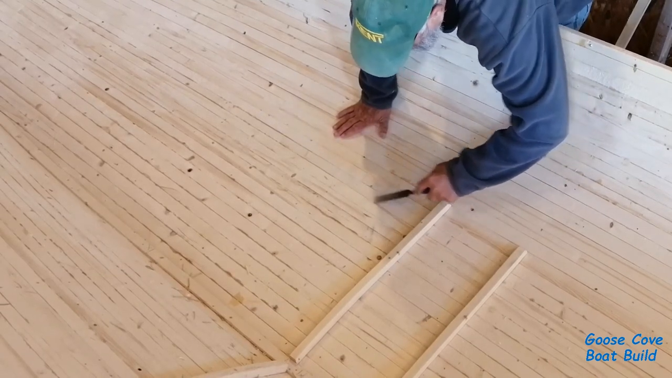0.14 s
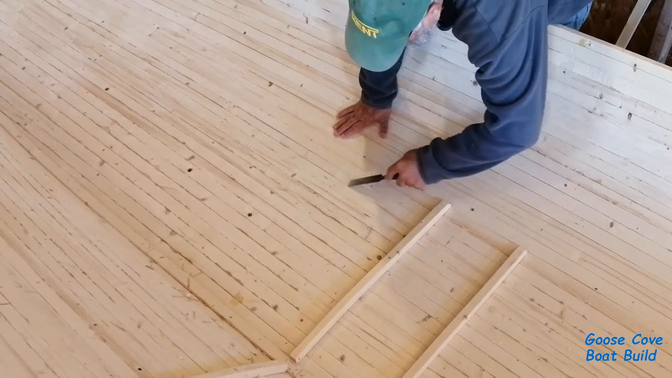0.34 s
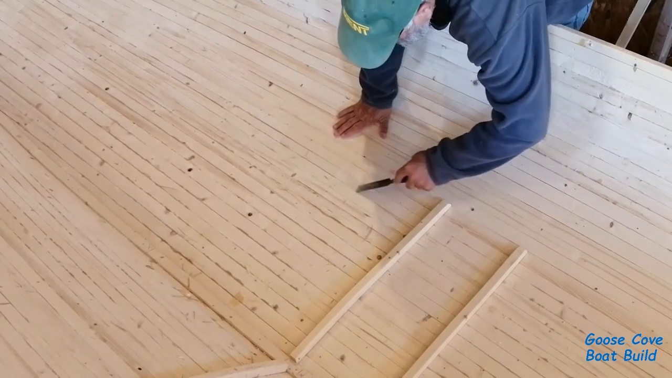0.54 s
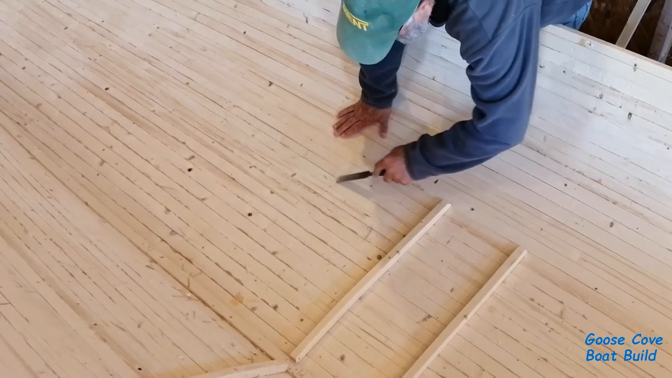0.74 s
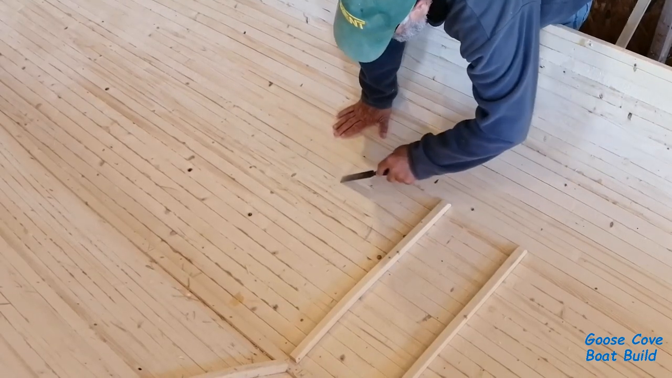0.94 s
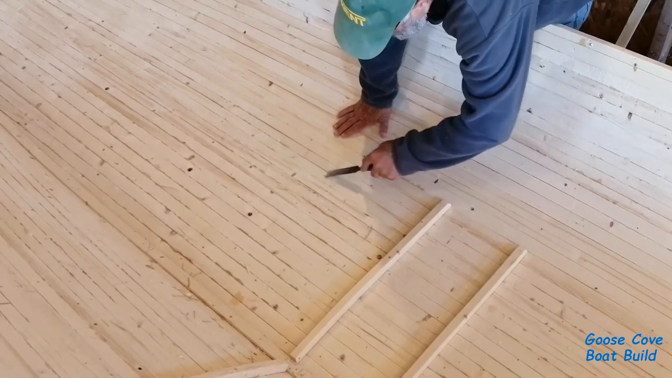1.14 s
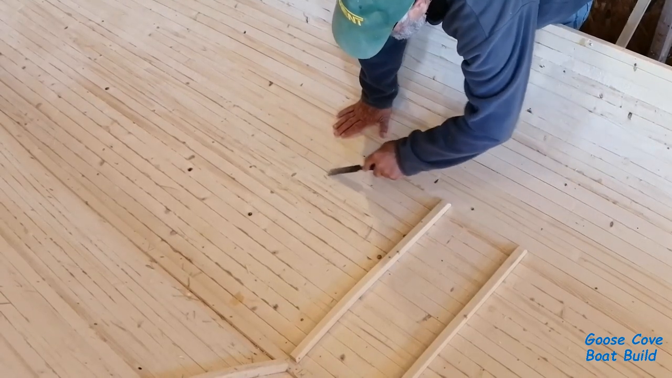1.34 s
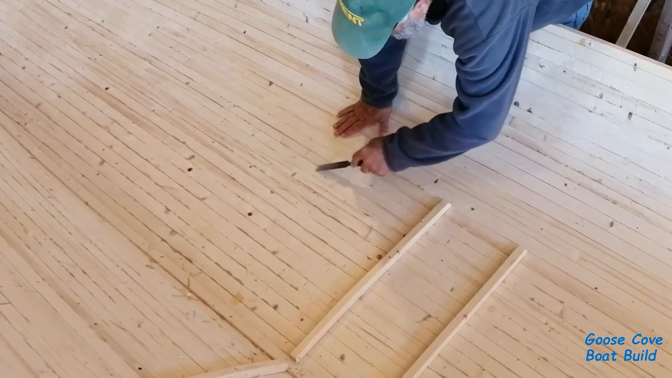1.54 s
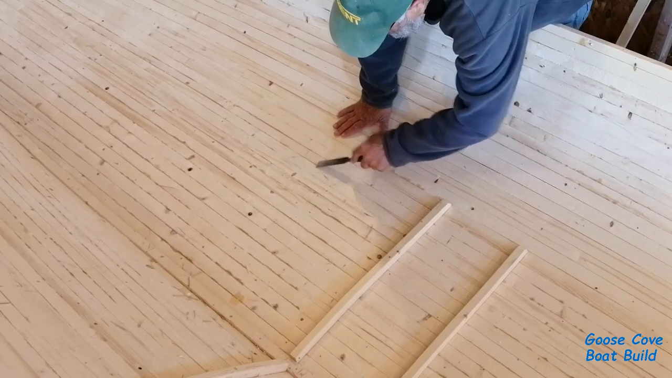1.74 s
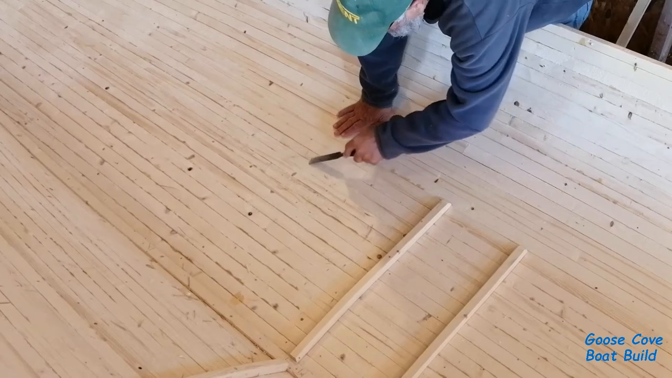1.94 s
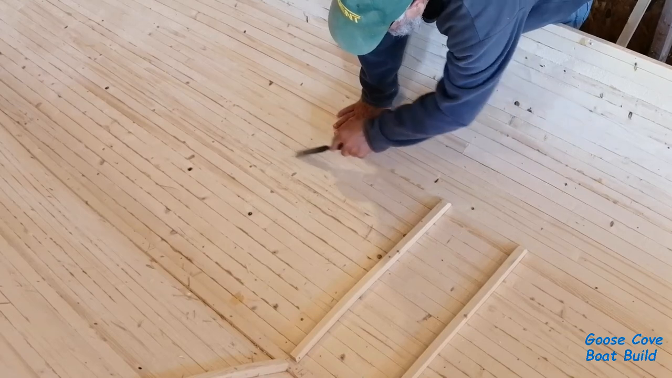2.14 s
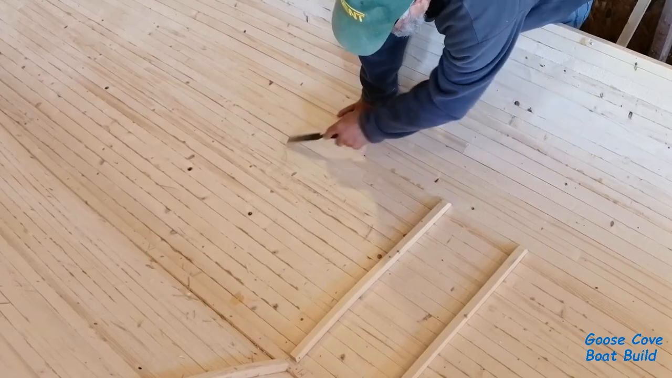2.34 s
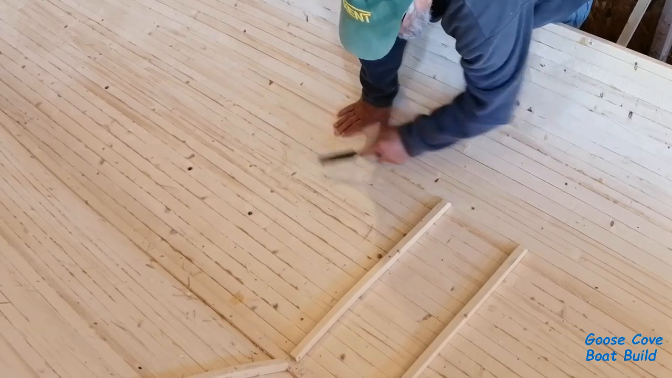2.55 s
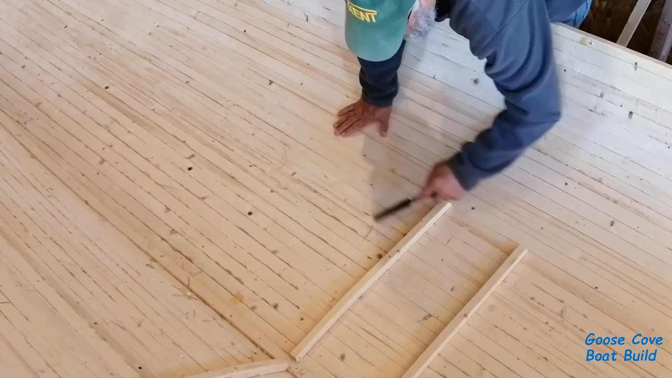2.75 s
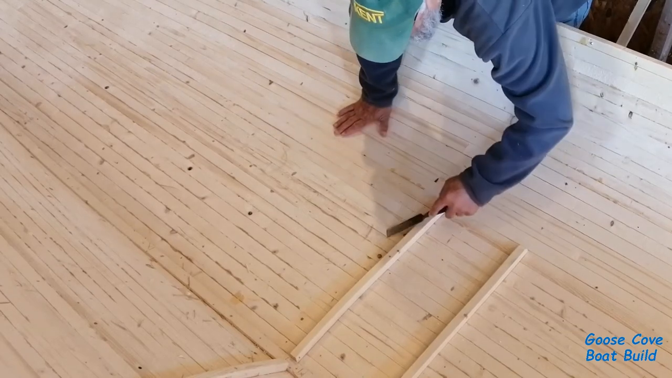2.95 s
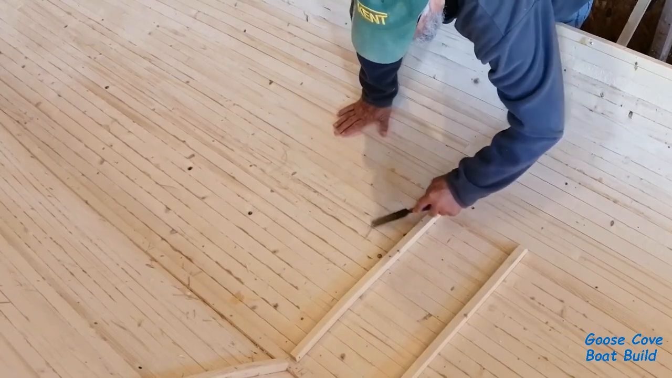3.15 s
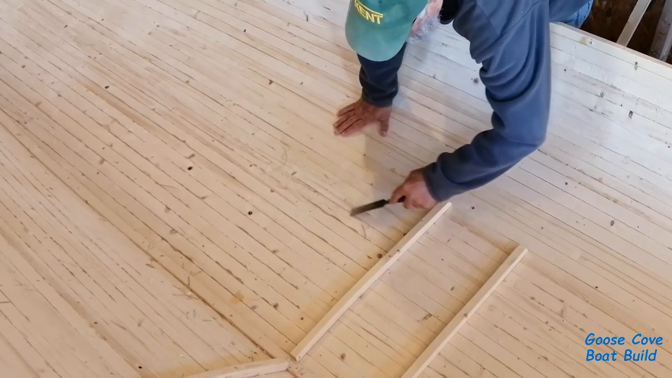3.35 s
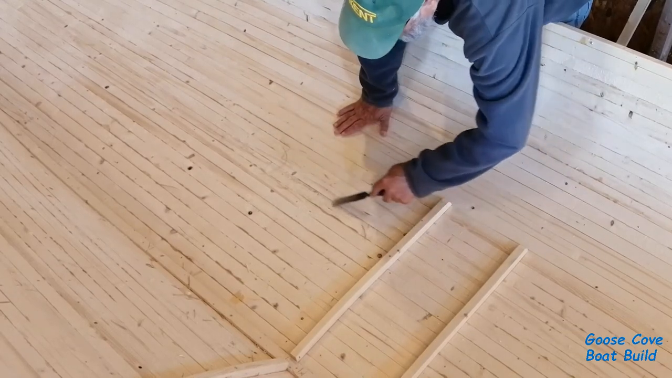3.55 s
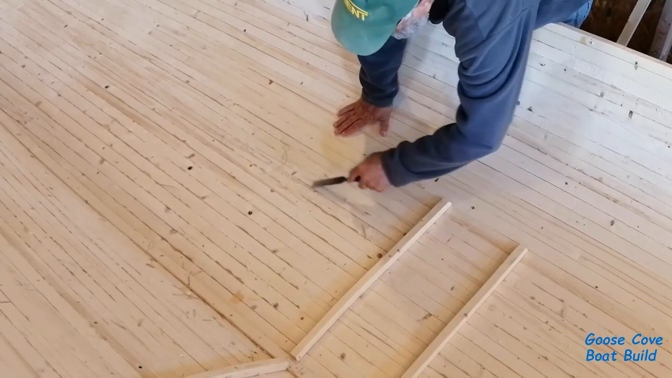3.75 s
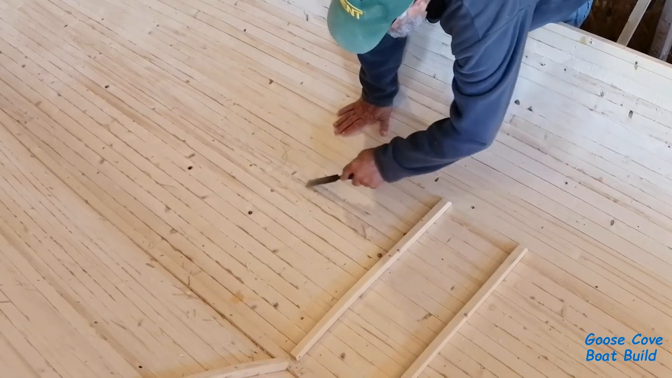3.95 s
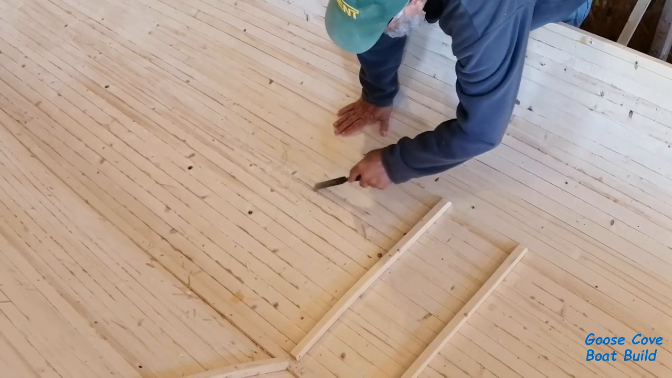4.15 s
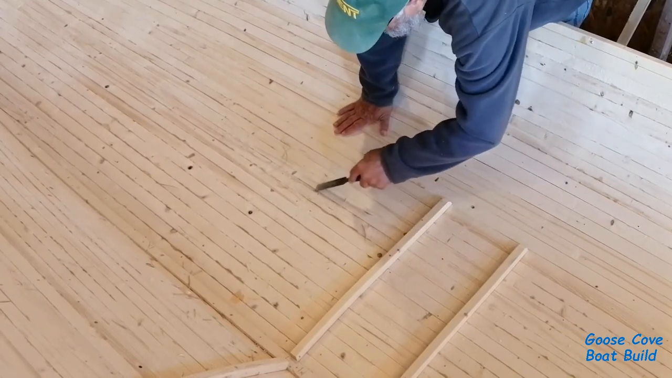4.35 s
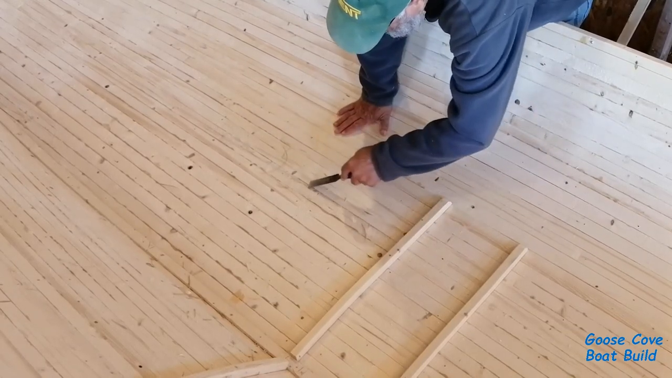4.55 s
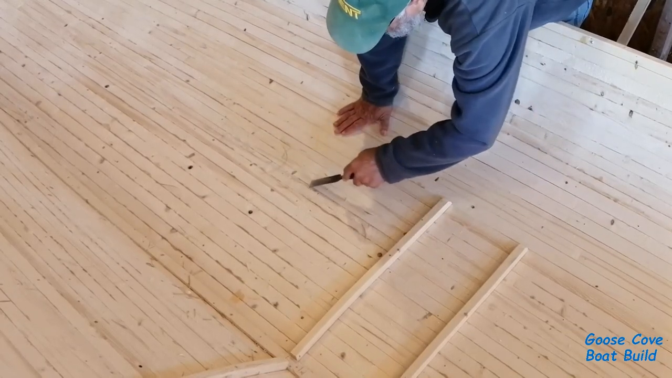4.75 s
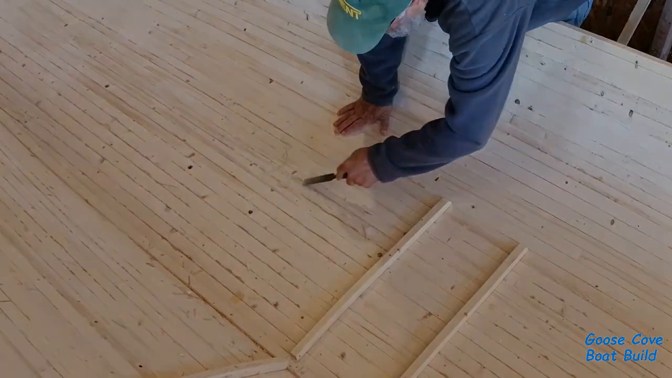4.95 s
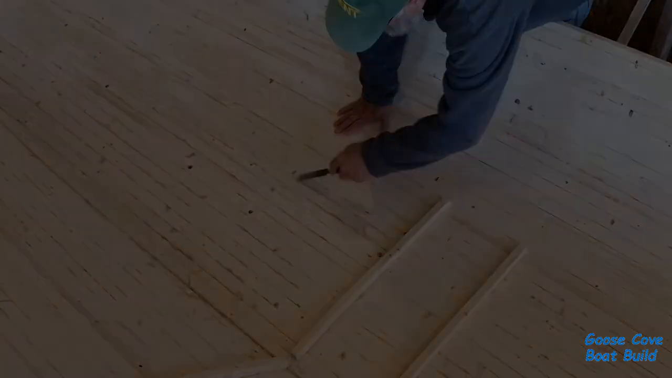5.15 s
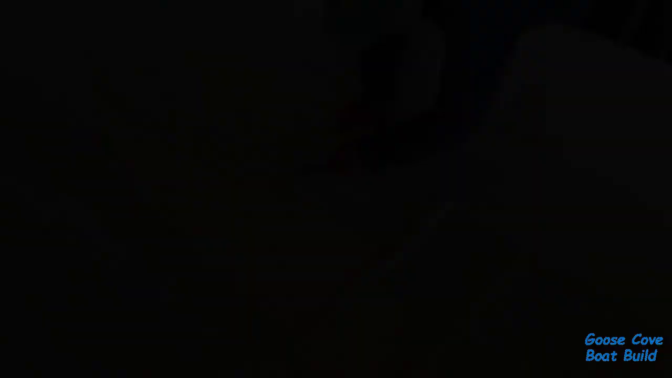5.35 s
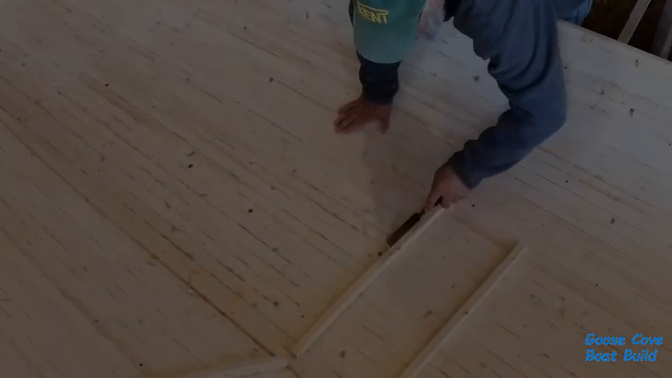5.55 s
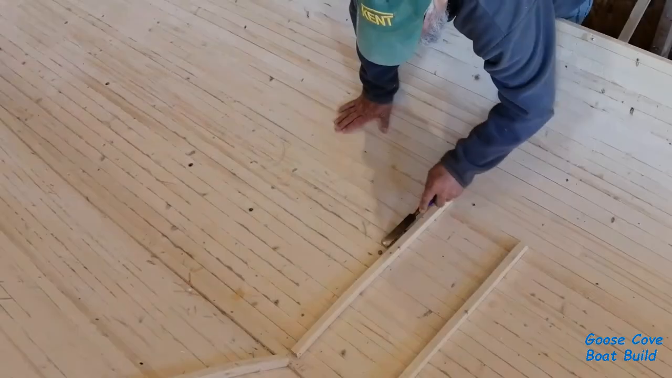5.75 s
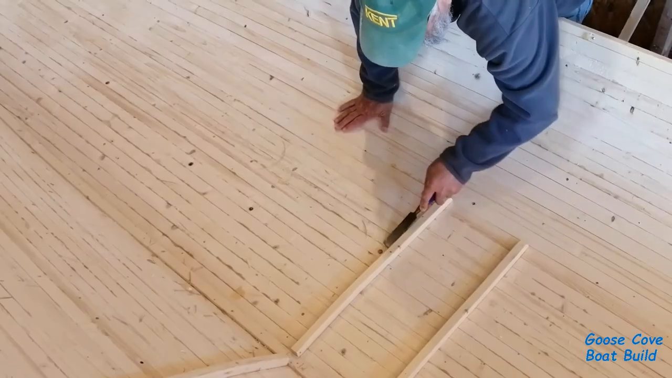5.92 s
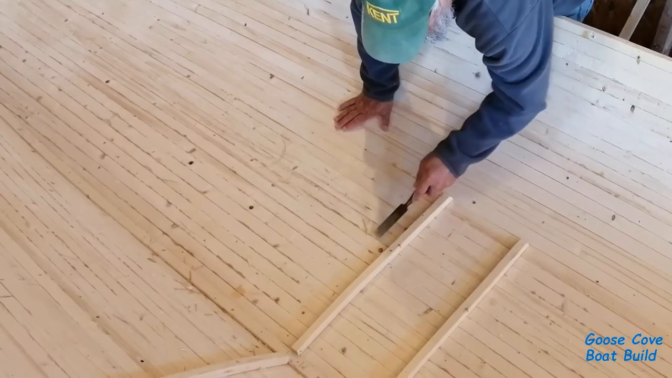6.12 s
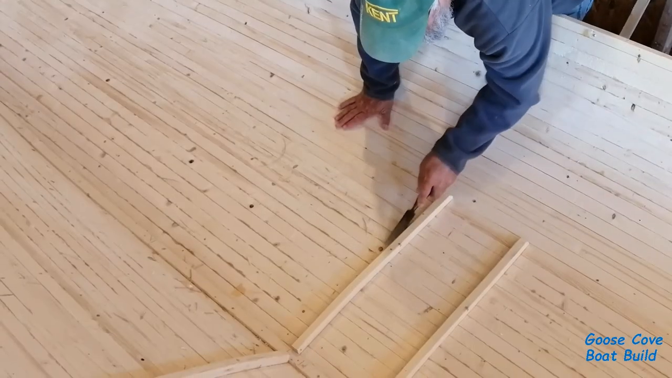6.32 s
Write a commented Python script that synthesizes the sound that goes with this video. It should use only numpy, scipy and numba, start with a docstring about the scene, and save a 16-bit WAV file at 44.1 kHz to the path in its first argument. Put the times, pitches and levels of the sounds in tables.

```python
"""Scraping a wooden boat

A hand scraper is drawn in short strokes over the planked hull of a wooden boat in a workshop.
Random slips of the blade, filtered, make the hollow hull rumble, the planks chatter and torn fibres rasp.
Now and then the hull is bumped, and its low modes ring as decaying sine waves.
The shop fades out, and something small is handled close by: soft rubs are swells of fine slips,
light clicks are short noise bursts through the resonances of a small body."""
import sys
import numpy as np
from scipy import signal
from scipy.fft import rfft, irfft
from scipy.io import wavfile
from scipy.ndimage import uniform_filter1d
from numba import njit

SR = 44100
rng = np.random.default_rng(int(sys.argv[2]) if len(sys.argv) > 2 else 0)


def generate_wav(sig):
    """Save sig (samples, or channels by samples) to the path in sys.argv[1] as 16-bit PCM at SR."""
    pcm = np.round(np.clip(np.atleast_2d(sig).T, -1, 1) * 32767).astype(np.int16)
    wavfile.write(sys.argv[1], SR, pcm)


N = 281358  # length in samples
TIME = np.arange(N) / SR  # s
FREQ = np.arange(2 ** 14 + 1) * SR / 2 ** 15  # Hz


def undb(db):
    """Turn a level in dB into a gain."""
    return 10 ** (np.asarray(db) / 20)


def unit(x):
    """The same sound at rms 1."""
    return x / np.sqrt(np.mean(x ** 2))


def band(x, hz, kind, order=4):
    """Butterworth filter: keeps the low, the high or a middle band of frequencies."""
    return signal.sosfilt(signal.butter(order, hz, kind, fs=SR, output="sos"), x)


def steep_low_pass(x, top_hz, ripple_db):
    """Elliptic filter: removes nearly everything above top_hz."""
    return signal.sosfilt(signal.ellip(10, ripple_db, 70, top_hz, fs=SR, output="sos"), x)


def colour(x, points, peaks=()):
    """Filter a sound by a smooth spectrum with resonances standing out of it."""
    hz, db = np.transpose(points)
    db = np.interp(np.log(FREQ + 1), np.log(hz), db)
    for centre, width, height in peaks:
        db = db + height / (1 + (2 * (FREQ - centre) / width) ** 2)
    # folding the cepstrum forward in time makes the filter respond only after its input
    size = len(FREQ) - 1
    cepstrum = irfft(np.log(undb(db)))[:size]
    cepstrum[1:] *= 2
    response = irfft(np.exp(rfft(cepstrum, 2 * size)))[:size]
    return signal.fftconvolve(x, response)[:len(x)]


def fade(t, t60):
    """Exponential decay, 60 dB down after t60 seconds."""
    return np.exp(-np.log(1000) * t / t60)


def room(x, t60, wet_db):
    """The direct sound plus a diffuse tail of reflections, made of decaying noise."""
    t = TIME[:SR // 4]
    tail = rng.standard_normal(len(t)) * fade(t, t60)
    tail = tail / np.linalg.norm(tail)
    return x + undb(wet_db) * signal.fftconvolve(x, tail)[:len(x)]


def add(out, s, sound):
    """Mix a sound in at time s, in seconds."""
    i = max(int(s * SR), 0)
    out[i:i + len(sound)] += sound[:max(N - i, 0)]


def slips(rate, scatter_db):
    """The blade catches and lets go at uneven intervals (rate per second), each time with its own force."""
    happens = rng.random(N) < rate / SR
    direction = np.sign(rng.standard_normal(N))
    strength = undb(scatter_db * np.clip(rng.standard_normal(N), -2, 2))
    return happens * direction * strength


def wander(rate):
    """Slow chance: random levels, rate per second, smoothed twice and brought to rms 1."""
    k = int(SR / rate)
    steps = np.repeat(rng.standard_normal(N // k + 1), k)
    smooth = uniform_filter1d(uniform_filter1d(steps, k), k)
    return unit(smooth[:N])


def travel(x, t60, wet_db, rate, drift_s):
    """As the blade moves, its sound takes other paths through the planks, so the fine colour keeps shifting."""
    shares = [np.exp(wander(rate)) for _ in range(3)]
    paths = sum(share * room(x, t60, wet_db) for share in shares)
    mixed = paths / np.sqrt(sum(share ** 2 for share in shares))
    # the paths also lengthen and shorten, which bends their resonances
    return np.interp(TIME - drift_s * wander(rate), TIME, mixed)


def bounce(x, lag_s, sway, gain):
    """A reflection off the deck whose delay swings with the arm: ripples glide through the spectrum."""
    lag = lag_s * (1 + sway * wander(rate=4))
    return x + gain * np.interp(TIME - lag, TIME, x)


def steady(x, window_s):
    """The same grain at an even force: divided by its own running rms."""
    power = uniform_filter1d(x ** 2, int(window_s * SR))
    return x / np.sqrt(power + 1e-12 * np.mean(x ** 2))


@njit
def resonance(x, hz, damping):
    """State-variable band-pass whose centre moves; less damping makes it narrower."""
    y, b, low = np.empty(len(x)), 0., 0.
    for i in range(len(x)):
        g = np.tan(np.pi * hz[i] / SR)
        v = (b + g * (x[i] - low)) / (1 + g * (g + damping))
        b, low, y[i] = 2 * v - b, low + 2 * g * v, damping * v
    return y


# pulls of the scraper and the light slides back between them:
# hold begins at t/s, attack before it t/s, hold t/s, then base levels before small trims:
# fibre rasp level/dB, plank chatter level/dB, hull rumble level/dB, panel boom level/dB;
# rumble centre f/Hz, change of force along the hold level/dB
STROKES = [ (0, 0.093, 0.16, -67, -60.5, -47, -56, 221, -18),
           (0.34, 0.17, 0.16, -53, -48, -42, -65.5, 242, 0.5),
           (0.624, 0.24, 0.071, -66.5, -53.5, -41.5, -62, 196, -2),
           (.815, 0.087, .15, -51.5, -42, -43, -52, 202, 1.5),
           (1.063, 0.19, .16, -70.5, -60, -47.5, -63.5, 203, -1),
           (1.234, 0.091, 0.077, -49, -39, -45, -56.5, 198, -1.5),
           (1.325, .1, 0.16, -65.5, -64.5, -52.5, -52.5, 170, -10.5),
           (1.558, 0.052, 0.089, -47.5, -38, -40.5, -44, 159, 1.5),
           (1.73, 0.092, 0.057, -71, -55, -55.5, -53.5, 159, -0.5),
           (1.927, 0.075, 0.088, -49, -42.5, -47, -48, 183, -1.5),
           (2.094, .079, 0.061, -75, -69, -56.5, -57.5, 179, -1.5),
           (2.268, 0.058, 0.077, -47.5, -39.5, -40.5, -47, 206, -1.5),
           (2.391, 0.15, 0.033, -54.5, -42.5, -38, -44.5, 200, -2),
           (2.488, .083, .06, -74, -68.5, -45, -43.5, 152, -5),
           (3.057, 0.035, 0.17, -74.5, -78, -54, -53, 160, -6),
           (3.269, 0.14, 0.22, -62, -47.5, -44, -56, 184, 2.5),
           (3.538, 0.11, 0.31, -58, -45.5, -38.5, -49.5, 179, 1),
           (3.923, 0.099, 0.072, -51.5, -46.5, -39, -52, 205, -3.5),
           (4.194, 0.12, 0.034, -65, -57.5, -42.5, -51, 172, -1.5),
           (4.363, 0.1, .04, -55.5, -49, -42, -49.5, 160, -2.5),
           (4.47, 0.024, 0.087, -64.5, -47, -43.5, -61, 237, -4),
           (4.679, 0.11, 0.055, -50, -38.5, -35, -40, 177, -3),
           (4.8, .085, 0.13, -74.5, -60, -46, -57, 174, -0.5),
           (4.954, 0.064, 0.08, -50, -40.5, -36.5, -41.5, 168, -5.5),
           (5.295, 0.06, 0.038, -67.5, -61.5, -59.5, -67.5, 171, -1), ]
# the force climbs BITE_DB during the attack; the ends of the hold lie ARCH_DB below its middle
BITE_DB, ARCH_DB = 28.5, 0.86
# just before and after a stroke the blade skims the wood lightly
SKIM_DB, SKIM_FALL_DB_PER_S = -17, 151.5


def force(levels_db, fall_db_per_s):
    """Gain of one layer through all strokes: the blade skims, bites, holds and lets go."""
    power = np.zeros(N)
    for (start, attack, hold, *_, lean_db), db in zip(STROKES, levels_db):
        near = slice(max(int((start - .25) * SR), 0), int((start + hold + .5) * SR))
        t = TIME[near] - start
        before, after = np.maximum(-t, 0), np.maximum(t - hold, 0)
        along = np.clip(2 * t / hold - 1, -1, 1)  # -1 to 1 through the hold
        hold_db = lean_db * along / 2 - ARCH_DB * along ** 2
        cut_db = hold_db - BITE_DB * before / attack - fall_db_per_s * after
        skim_db = SKIM_DB - SKIM_FALL_DB_PER_S * (before + after)
        power[near] += undb(db + cut_db) ** 2 + undb(db + skim_db) ** 2
    return np.sqrt(power)


# colour of the scraped wood: f/Hz, level/dB (per Hz)
WOOD = [(18, -28), (33, -9), (55, -9.5), (95, -2), (135, -2.5), (220, -3.5), (400, -13.5), (600, -14.5),
        (780, -16), (1050, -27), (1380, -20.5), (2250, -24.5), (3050, -24), (3650, -33.5), (5000, -32),
        (7000, -36)]
# resonances of planks and blade under the scraper: f/Hz, width f/Hz, level/dB over the smooth colour
PLANKS = [(33.7, 20, 7), (82.7, 9, 8), (136.4, 5.7, 3.5), (327.4, 50, 5), (446, 25, 2), (580, 11, 2.5),
          (672, 14, 4), (2860, 200, 3)]
# how fast each layer dies away after the hold
RASP_FALL_DB_PER_S, CHATTER_FALL_DB_PER_S, RUMBLE_FALL_DB_PER_S, BOOM_FALL_DB_PER_S = 205, 201.5, 170, 96
# the hiss of the finest fibres, above this frequency, stops sooner than the rest of the rasp
HISS_HZ, HISS_DB, HISS_FALL_DB_PER_S = 3780, .5, 260


def scraper():
    """Coarse slips shake hull and planks; finer fibre breaks add the rasp and its hiss."""
    start, _, hold, rasp_db, chatter_db, rumble_db, boom_db, centre_hz, _ = np.transpose(STROKES)
    catches = unit(slips(rate=1000, scatter_db=2.5))
    fibres = unit(slips(rate=3000, scatter_db=4.0))

    hull = colour(travel(catches, t60=0.36, wet_db=2.5, rate=6, drift_s=.003), WOOD, PLANKS)
    boom = steady(band(hull, 108, "low"), window_s=0.12)
    boom = boom * force(boom_db - 1.4, BOOM_FALL_DB_PER_S)

    groan = bounce(hull, lag_s=0.0112, sway=0.31, gain=0.5)
    groan = band(groan, [100, 420], "band", order=3)
    # the centre glides from the middle of one hold to the next
    groan = resonance(groan, np.interp(TIME, start + hold / 2, centre_hz), 0.45)
    rumble = steady(groan, window_s=0.082) * force(rumble_db, RUMBLE_FALL_DB_PER_S)

    plank = colour(travel(catches, t60=0.15, wet_db=3.5, rate=8, drift_s=0.00201), WOOD, PLANKS)
    plank = bounce(plank, lag_s=0.006966, sway=.22, gain=0.32)
    plank = steady(band(plank, [340, 1100], "band", order=3), window_s=0.029)
    chatter = plank * force(chatter_db, CHATTER_FALL_DB_PER_S)

    edge = colour(travel(catches + fibres, t60=0.1, wet_db=5.5, rate=9, drift_s=.002), WOOD, PLANKS)
    edge = bounce(edge, lag_s=0.0027, sway=.25, gain=0.33)
    edge = steady(band(edge, 1030, "high", order=3), window_s=0.048)
    rasp = band(edge, HISS_HZ, "low", order=3) * force(rasp_db + 0.25, RASP_FALL_DB_PER_S)
    hiss = band(edge, HISS_HZ, "high", order=3) * force(rasp_db + HISS_DB, HISS_FALL_DB_PER_S)
    return boom + rumble + chatter + rasp + hiss


# modes of the bumped hull: f/Hz (each blow detunes it a little), relative level/dB, 60 dB decay t/s
HULL = [(75.4, -19, 0.41), (119.2, -4.5, .46), (151.2, -15, 0.11), (160.6, -1, 0.41), (197.9, 2, .35),
        (253.6, 0, .33), (299, -2, 0.34), (354, -1.5, 0.31), (457, -21, 0.17), (550, -17.5, 0.21),
        (665, -14, 0.24)]
# bumps on the hull: t/s, peak level/dB, hardness as upper corner f/Hz
BUMPS = [(0.01, -49.5, 350), (0.624, -32, 302), (2.37, -19.5, 393), (2.4, -18.5, 416), (2.449, -22.5, 165),
         (3.042, -41.5, 296), (3.755, -31, 253), (4.183, -27, 234), (4.23, -28, 257), (4.470, -29, 780),
         (4.695, -27.5, 353)]


def bumps():
    """Dull blows ring the hull's low modes; a harder contact reaches higher ones."""
    out, t = np.zeros(N), TIME[:SR // 2]
    for s, db, hard_hz in BUMPS:
        ring = np.zeros(len(t))
        for hz, mode_db, t60 in HULL:
            detune = 1 + 0.016 * rng.standard_normal()
            sign = rng.choice([-1, 1])
            ring += sign * undb(mode_db) * np.sin(2 * np.pi * hz * detune * t) * fade(t, t60)
        noise = rng.standard_normal(len(t))
        thud = unit(band(noise, [120, 900], "band", order=3)) * fade(t, 0.37)
        blow = band(ring + undb(-2.5) * thud, [70, hard_hz], "band", order=2)
        add(out, s, blow * undb(db) / np.abs(blow).max())
    return out


# colour of the shop air: f/Hz, level/dB (per Hz, relative)
AIR = [(18, -44), (30, -14.5), (81, -11.5), (169, -19), (218, -28), (345, -20), (499, -25.5), (2000, -32.5),
       (7400, -42.5), (9620, -77), (16300, -120)]


def still_air():
    """Steady faint noise in the colour of the shop."""
    return unit(colour(rng.standard_normal(N), AIR)) * undb(-69)


SHOP_END_S, SHOP_TOP_HZ = 5.372, 7350


def shop():
    """Scraping, bumps and still air, dull on top, faded out quickly at the end."""
    sound = scraper() + bumps() + still_air()
    sound = steep_low_pass(sound, SHOP_TOP_HZ, ripple_db=.3)
    return sound * np.clip((SHOP_END_S - TIME) / 0.025, 0, 1)


def faint_hiss():
    """Very faint noise all the way through, rolling off gently above 4600 Hz."""
    return unit(band(rng.standard_normal(N), 4600, "low", order=1)) * undb(-93.5)


# resonances of the handled thing, also rung by the clicks:
# f/Hz (times the pitch of a click), width f/Hz, level/dB over the smooth colour
TRINKET = [(490, 45, 5), (711, 60, 7), (1160, 90, 8), (1400, 80, 5), (2040, 140, 4)]
# colour of the rubs: f/Hz, level/dB (per Hz, relative)
RUB_COLOUR = [(71, -79), (120, -16), (478, -7.5), (1060, -11.5), (2030, -7.5), (2750, -15.5), (3370, -12),
              (6330, -30.5), (15500, -33.5)]
# soft rubs: middle t/s, half length t/s, level/dB in the middle
RUBS = [(5.427, 0.016, -73.5), (5.696, 0.015, -79.5), (5.746, 0.016, -70.5), (5.849, 0.015, -63.5),
        (5.879, 0.022, -63.5), (5.954, 0.019, -65), (6.029, 0.024, -68)]


def rubs():
    """Brief swells of fine friction on a small body: many tiny slips through its resonances."""
    friction = room(slips(rate=3000, scatter_db=4.0), t60=0.096, wet_db=6.5)
    grain = unit(colour(friction, RUB_COLOUR, TRINKET))
    swells = sum(undb(db) * np.exp(-((TIME - s) / half) ** 2) for s, half, db in RUBS)
    return grain * swells


# colour of the clicks: f/Hz, level/dB (per Hz, relative)
CLICK_COLOUR = [(100, -26.5), (300, -21), (380, -21.5), (500, -8.5), (1200, -6), (2000, -8), (3300, -4.5),
                (6000, -8), (15000, -46.5)]
# light clicks: t/s, level/dB (of twice the body's rms in the first 10 ms),
# snap level/dB relative to the body, ring pitch as a factor
CLICKS = [(5.514, -61.5, -15.5, 0.95), (5.529, -59.5, -13.5, 1.14), (5.547, -61.5, -31, 0.78),
          (5.562, -61.5, -28, 0.69), (5.599, -58, -21, 1.36), (5.618, -61, -17, 1.1),
          (5.649, -61.5, -25, 0.56), (5.95, -49, -22, 1.076), (6.014, -59, -20, 1.18),
          (6.065, -44.5, -18, 0.99), (6.1438, -49.5, 12.5, 0.98), (6.2073, -47, -21, 1.07),
          (6.225, -45, 1.5, 0.98), (6.267, -50.5, -26, 0.96), (6.285, -51.5, -9, 0.65),
          (6.3, -39.5, -11.5, 0.98), (6.325, -44, -4, 0.68), (6.345, -45, -23, 0.89),
          (6.366, -39.5, -13, 0.94)]
# the sparkle on top of a click grows with its snap: level at a snap of 0 dB, and dB per dB of snap
SPARKLE_DB, SPARKLE_PER_SNAP = -8.5, 1.18


def clicks():
    """Each click rings a small hollow body whose pitch depends on the grip; the treble dies first."""
    out, t = np.zeros(N), TIME[:SR // 4]
    for s, db, snap_db, pitch in CLICKS:
        burst = rng.standard_normal(len(t))
        burst[0] += 1.2  # strengthens the first contact against its reflections
        ring = colour(burst * fade(t, 0.098), CLICK_COLOUR, np.array(TRINKET) * [pitch, 1, 1])
        body = unit(band(ring, 2000 * pitch, "low"))
        snap = unit(band(band(ring, 1960, "high"), 6200, "low", order=3))
        sparkle = unit(band(burst * fade(t, 0.068), [7500, 15000], "band", order=2))
        sparkle_db = SPARKLE_DB + SPARKLE_PER_SNAP * snap_db
        click = body + undb(snap_db) * snap + undb(sparkle_db) * sparkle
        onset = 2 * body[:SR // 100].std()
        add(out, s, click * undb(db) / onset)
    return out


def scene():
    """The shop, then the close handling, over a very faint hiss."""
    return (shop() + faint_hiss() + rubs() + clicks())[None]


TOP_HZ = 15800


def record(dry):
    """Cut the very top of the treble steeply."""
    return steep_low_pass(dry, TOP_HZ, ripple_db=.2)


dry = scene()
out = record(dry)
generate_wav(out)
```